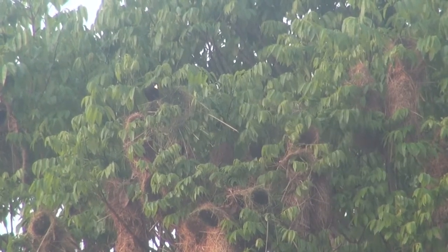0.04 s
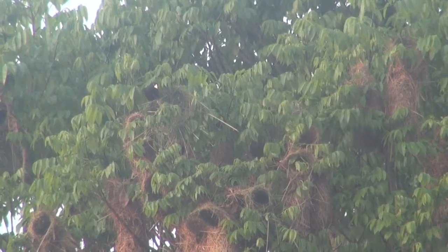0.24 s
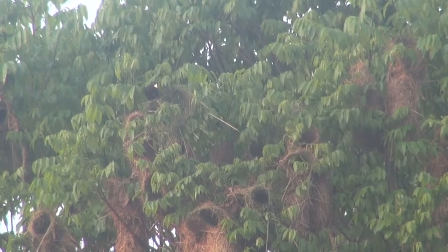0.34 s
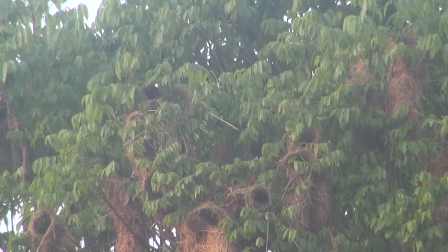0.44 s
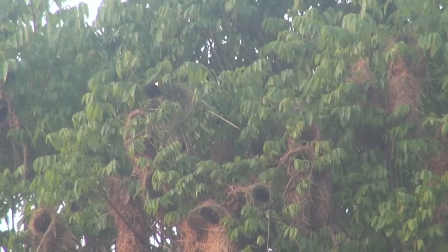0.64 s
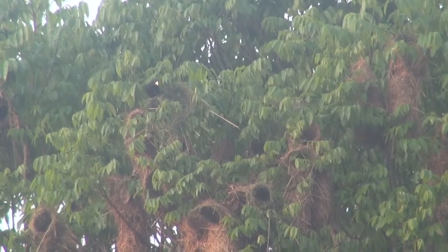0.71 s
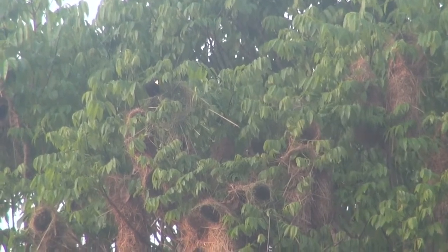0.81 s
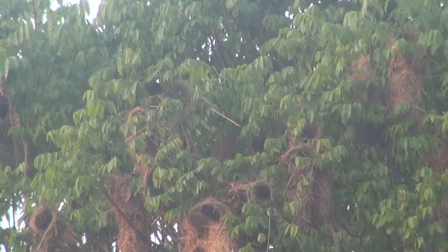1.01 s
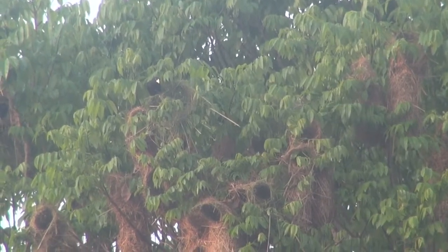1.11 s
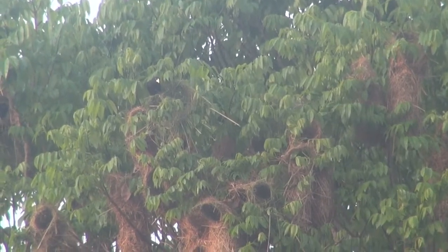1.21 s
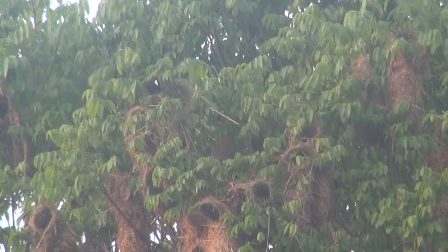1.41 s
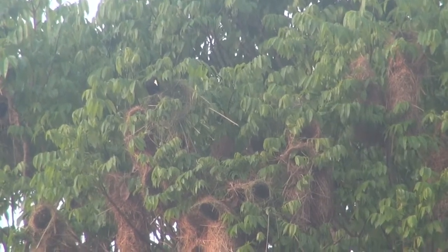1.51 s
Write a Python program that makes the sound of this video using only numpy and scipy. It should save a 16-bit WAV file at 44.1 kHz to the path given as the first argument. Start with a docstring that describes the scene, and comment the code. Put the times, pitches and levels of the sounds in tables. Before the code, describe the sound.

Birds call to the right in a thick forest: a faint whoop, one close, rough squawk with a brief echo, distant whistles and pips, and finally a quick raspy chatter. Leaves hiss softly and steadily underneath.

```python
"""A near bird's short, harsh squawk, thrown back by the trunks of a dense tropical forest.
A second bird chatters in quick, raspy upward sweeps. Both voices are fluttering harmonics
shaped by a throat, plus noise. The chattering bird also gives one arched, almost pure whoop;
farther birds whistle and pip. The birds sit to the right, over a steady hiss of foliage,
a thin distant drone and a low hum."""
import sys
import numpy as np
from scipy import signal
from scipy.fft import rfft, irfft, next_fast_len
from scipy.io import wavfile
from scipy.ndimage import map_coordinates

SR = 44100
rng = np.random.default_rng(int(sys.argv[2]) if len(sys.argv) > 2 else 0)


def log_audio(samples):
    """Write samples as a 16-bit WAV file to the path given in sys.argv[1]."""
    # one column per channel
    frames = np.atleast_2d(samples).T
    # limit to full scale, then quantise
    limited = np.clip(frames, -1, 1)
    pcm = np.round(limited * 32767).astype(np.int16)
    wavfile.write(sys.argv[1], SR, pcm)


N = 68355

# Squawk contour. Each row: time in seconds, pitch in Hz, level before the throat in dB,
# extra ring of harmonic 2 in dB, roughness factor.
SQUAWK_CONTOUR = [(.191, 566.6, -48.5, 4.5, 0.04), (.2, 581.3, -39, 6.5, 0.25),
                  (.21, 678.7, -26, -4.5, 0.1), (.218, 744.3, -21.5, 2, 0.31), (.226, 652.5, -21.5, -2, 0),
                  (.235, 750.2, -26, 3, 0.48), (.246, 699, -26.5, 7, 0.65), (.2495, 701, -27.5, -4.5, 1.23),
                  (.254, 750.6, -22.5, 3, .8), (.26, 705, -30, 6, 0.86), (.273, 631, -29, 0, 1.14),
                  (.285, 624, -38, 0, 1.23), (.303, 540, -45.5, 0, 1)]
# Squawker's throat. Each row: frequency in Hz, gain in dB.
SQUAWK_THROAT = [(350, -40), (570, -13), (640, -10), (1100, -8), (1300, -8), (1450, -4), (1720, -14),
                 (2000, -14), (2350, -32.5), (2900, -32), (3500, -53), (9000, -74)]
# Rasp in the squawk. Each row: frequency in Hz, relative density in dB.
SQUAWK_RASP_SPECTRUM = [(450, -31), (800, 1), (950, -4), (1150, 10), (1450, -1), (1900, 8.5), (2300, -17),
                        (2600, -37)]
# Thin overtone on the squawk. Each row: time in seconds, pitch in Hz, level in dB.
OVERTONE_CONTOUR = [(.198, 9960, -79), (.215, 9850, -57), (.225, 10000, -71), (.24, 10300, -51.5),
                    (.28, 10040, -78)]
# Chatter notes. Each row: start in seconds, length in seconds, low pitch in Hz, top pitch in Hz,
# level in dB, fade in dB per second, then gains in dB of harmonics 1, 2, 3 on the held top.
CHATTER_NOTES = [(1.252, 0.039, 2100, 2942, -51.5, 2, 1, 7.5, 10),
                 (1.306, 0.047, 1100, 2800, -48, 104, -11, -0.5, -7.5),
                 (1.375, .042, 1002, 2554, -46.5, 150, 3, 4.5, 3),
                 (1.442, 0.0566, 998, 2581, -49, 28, 2.5, -8, 8),
                 (1.504, 0.045, 950, 2492, -49, 202, 1, -5, 7)]
# Chatter source. Each entry: gain in dB, for harmonics 1 to 5.
CHATTER_HARMONICS_DB = [1, -2.5, -7.5, -4, -24]
# Chatterer's throat. Each row: frequency in Hz, gain in dB.
CHATTER_THROAT = [(1000, 7), (1600, -1.5), (2550, -7), (3300, 5), (4500, 5), (5200, -1.5), (5800, 2),
                  (7500, -8), (8800, 1), (10000, -15.5), (14000, -15)]
# Noise in each chatter note. Each row: frequency in Hz, relative density in dB.
CHATTER_HOARSE_SPECTRUM = [(900, -45), (1600, 2), (3000, -14), (5000, -2), (9300, -8), (13000, -19),
                           (16000, -48)]
# Rasp under the chatter. Each row: time in seconds, level in dB.
CHATTER_RASP_ENVELOPE = [(1.222, -86), (1.24, -55.5), (1.27, -51.5), (1.35, -50.5), (1.44, -53.5),
                         (1.55, -52.5)]
# Colour of that rasp. Each row: frequency in Hz, relative density in dB.
CHATTER_RASP_SPECTRUM = [(500, -63), (1700, -38), (2200, -10), (2650, -2.5), (4600, -3.5), (5800, -5.5),
                         (8000, -11.5), (11000, -23.5), (16000, -51)]
# Chatterer's whoop. Each row: time in seconds, pitch in Hz, level in dB.
WHOOP_CONTOUR = [(.052, 1080, -62.5), (.07, 1117, -54), (.08, 1442, -57.5), (.091, 1873, -45),
                 (.1, 2163, -57), (.113, 2855, -59), (.13, 2850, -63), (.141, 2400, -55), (.149, 2150, -59)]
# Whistles. Each row: start in seconds, length in seconds, start, middle and end pitch in Hz, level in dB.
WHISTLE_NOTES = [(-.04, 0.18, 8040, 8050, 8400, -66), (0.378, 0.095, 3750, 3164, 2365, -64),
                 (0.469, 0.038, 3230, 3315, 3180, -58), (0.626, 0.046, 8100, 7920, 7780, -71.5),
                 (0.591, 0.069, 4530, 3853, 3060, -61), (1.503, 0.0081, 2627, 3310, 4500, -45.5)]
# Far pips. Each row: peak time in seconds, level in dB.
PIP_NOTES = [(.629, -55), (0.686, -59), (.742, -54.5), (.799, -57.5), (.857, -59), (0.915, -57.5),
             (.977, -56.5)]
# Low note before the squawk. Each row: time in seconds, pitch in Hz, level in dB.
LOW_NOTE_CONTOUR = [(.04, 167.3, -70.5), (.14, 164.4, -64), (.16, 193.4, -61), (.185, 219, -56.5),
                    (.21, 242, -91)]
# Echoes off near trunks and far stands of trees. Each row: delay in seconds, gain in dB.
TRUNK_ECHOES = [(.022, -12.5), (.043, -27.5), (.069, -17.5)]
FAR_TREE_ECHOES = [(.16, -24), (.33, -31.5)]
# Forest ring. Each row: frequency in Hz, T60 in seconds.
FOREST_T60 = [(600, 1.65), (1500, 1.02), (4000, 0.46), (12000, 0.33)]
# Foliage hiss on each side. Each row: frequency in Hz, relative density in dB.
HISS_LEFT_SPECTRUM = [(25, -36), (60, -13), (150, -2), (300, -4.5), (700, -12.5), (1400, -14.5),
                      (3000, -24.5), (6000, -19), (10000, -22.5), (12000, -35.5), (16000, -43)]
HISS_RIGHT_SPECTRUM = [(25, -32), (60, -0.5), (150, -4), (300, -4.5), (500, -14.5), (850, -18), (1400, -9),
                       (3000, -15.5), (6000, -19), (10000, -21.5), (16000, -21.5)]
# The hiss eases off. Each row: time in seconds, gain in dB.
HISS_ENVELOPE = [(0, 2), (.55, 1.5), (.9, -0.5), (1.55, 0)]
# Hum and drones. Each row: centre in Hz, half-width in Hz, level in dB, left minus right in dB.
DRONE_BANDS = [(69.2, 2.8, -72.5, -15), (1105.5, 52, -70.5, -15), (2070, 31, -78.5, -7.5)]

TOP_HZ = 15850


def squawk(rasp_db=-11.5, hiss_db=-38.5):
    """A clear rising start rings on harmonic 2, then breaks into a rough, falling end."""
    hz, db, ring_db, rough, gate = curves(SQUAWK_CONTOUR)
    jitter = .032 * rough * wobble(650)
    harmonics_db = [0, ring_db, 0, 0, 0, 0, 0, 0]
    voiced = voice(hz * (1 + jitter), SQUAWK_THROAT, flutter=.32 * rough, harmonics_db=harmonics_db)
    rasp = amp(rasp_db) * rough * noise(SQUAWK_RASP_SPECTRUM)
    hiss = amp(hiss_db) * noise([(500, -40), (1500, 0), (4000, -3), (7000, -5), (12000, -16)])
    return gate * amp(db) * (voiced + rasp + hiss)


def overtone():
    """A thin, unsteady tone riding on the squawk."""
    hz, db, gate = curves(OVERTONE_CONTOUR)
    return gate * amp(db) * tone(hz * (1 + .0236 * wobble(1200)))


def among_trunks(call, left_lag_s=.000697):
    """A near call: sharp echoes off trunks, blurred ones off leaves and far trees. Left arrives later."""
    outgoing = thinned(call)
    blurred = scatter(outgoing, [(1000, .1)], rise_s=.002)
    far_trees = echoes(thinned(blurred), FAR_TREE_ECHOES)
    ring = scatter(outgoing, FOREST_T60, rise_s=.024)
    diffuse = amp(-9.5) * blurred + far_trees + amp(-26) * ring
    left, right = pan(-16) * (call + echoes(outgoing, TRUNK_ECHOES)) + pan(-19.5) * diffuse
    return np.array([echoes(left, [(left_lag_s, 0)]), right])


def chatter(sweep_mid_s=.012, sweep_s=.008, attack_s=.011, hold_s=.019, release_s=.0081, hoarse_db=-7):
    """Each note sweeps up hoarsely, then steadies and rings on its top pitch, over a continuous rasp."""
    notes, effort = np.zeros(N), np.zeros(N)
    for start_s, length_s, low_hz, top_hz, db, fade_db_per_s, *held_db in CHATTER_NOTES:
        t = clock() - start_s
        climb = (1 + np.tanh((t - sweep_mid_s) / sweep_s)) / 2
        jitter = (.05 - .044 * climb) * wobble(2000)
        hz = (low_hz + (top_hz - low_hz) * climb) * (1 + jitter)
        gate = np.clip(t / attack_s, 0, 1) * np.clip((length_s - t) / release_s, 0, 1)
        level = gate * amp(db - fade_db_per_s * np.clip(t - hold_s, 0, length_s))
        held = np.clip(2 * (t / hold_s - 1), 0, 1)
        harmonics_db = [base + held * gain for base, gain in zip(CHATTER_HARMONICS_DB, held_db + [0, 0])]
        notes += level * voice(hz, CHATTER_THROAT, flutter=.55 - .33 * held, harmonics_db=harmonics_db)
        effort += level * (1 - held / 2)
    hoarse = amp(hoarse_db) * effort * noise(CHATTER_HOARSE_SPECTRUM)
    rasp_db, rasp_gate = curves(CHATTER_RASP_ENVELOPE)
    rasp = rasp_gate * amp(rasp_db) * noise(CHATTER_RASP_SPECTRUM)
    call = perch_reflection(notes + (hoarse + rasp) * amp(wobble(250)))
    return place(call, balance_db=-6, leaves_db=-5, leaves_t60_s=.089, forest_db=-12.5,
                 echo_balance_db=-3.5)


def whoop():
    """The chatterer's almost pure note, climbing and falling back."""
    hz, db, gate = curves(WHOOP_CONTOUR)
    hz = hz * (1 + .015 * wobble(1200))
    partials = tone(hz) + amp(-41) * tone(2 * hz) + amp(-27) * tone(4 * hz)
    call = perch_reflection(gate * amp(db) * partials)
    return place(call, balance_db=-9, leaves_db=-14, leaves_t60_s=.12, forest_db=-20)


def whistles(waver_hz=130):
    """Short, wavering whistles from farther birds, each bent through three pitches."""
    out = np.zeros(N)
    for start_s, length_s, *pitches_hz, db in WHISTLE_NOTES:
        progress = np.clip((clock() - start_s) / length_s, 0, 1)
        hz = np.polyval(np.polyfit([0, .5, 1], pitches_hz, 2), progress)
        out += amp(db) * np.sin(np.pi * progress) * tone(hz + waver_hz * wobble(1200))
    return place(out, balance_db=-9, leaves_db=-2, leaves_t60_s=.18, forest_db=-8)


def pips(pitch_hz=1546, sigma_s=.0013):
    """An even run of tiny, soft sine bursts."""
    level = sum(amp(db) * np.exp(-((clock() - peak_s) / sigma_s) ** 2 / 2) for peak_s, db in PIP_NOTES)
    call = level * tone(np.full(N, pitch_hz))
    return place(call, balance_db=-8, leaves_db=-11, leaves_t60_s=.15, forest_db=-16)


def low_note():
    """A faint, husky note that rises just before the squawk."""
    hz, db, gate = curves(LOW_NOTE_CONTOUR)
    hz = hz * (1 + .12 * wobble(200))
    return pan(-9) * gate * amp(db) * (tone(hz) + amp(-13) * tone(2 * hz))


def foliage(left_db=-62, right_db=-57.5):
    """Soft hiss, independent on each side."""
    swell = amp(curves(HISS_ENVELOPE)[0] + .4 * wobble(6))
    left = amp(left_db) * noise(HISS_LEFT_SPECTRUM)
    right = amp(right_db) * noise(HISS_RIGHT_SPECTRUM)
    return swell * np.array([left, right])


def drones(waver_db=3.5):
    """A low hum and thin distant drones: narrow noise bands that waver in level."""
    out = np.zeros((2, N))
    for centre_hz, half_width_hz, db, balance_db in DRONE_BANDS:
        band = filtered(rng.standard_normal(N),
                        lambda hz: 1 / (1 + ((hz - centre_hz) / half_width_hz) ** 4))
        out += pan(balance_db) * amp(db + waver_db * wobble(8.65)) * unit_rms(band)
    return out


def place(call, balance_db, leaves_db, leaves_t60_s, forest_db, echo_balance_db=-5):
    """A call at its bearing, with quick leaf scatter and the long forest ring."""
    leaves = amp(leaves_db) * scatter(call, [(1000, leaves_t60_s)], rise_s=.0014)
    ring = amp(forest_db) * scatter(call, FOREST_T60, rise_s=.036)
    return pan(balance_db) * call + pan(echo_balance_db) * (leaves + ring)


def perch_reflection(call, delay_s=.00266, gain_db=-8):
    """A surface near the perch doubles the call, breaking a sweep into beads."""
    return echoes(call, [(0, 0), (delay_s, gain_db)]) / np.hypot(1, amp(gain_db))


def scatter(x, t60_rows, rise_s):
    """Stereo reflections that build up and die away; rows give T60 in seconds against Hz."""
    hz, t, bins = signal.stft(rng.standard_normal((2, SR)), SR, nperseg=256)
    decay = amp(-60 * t / along(t60_rows, hz)[:, None])
    tail = signal.istft(bins * decay, SR, nperseg=256)[1]
    tail *= 1 - np.exp(-np.arange(tail.shape[1]) / SR / rise_s)
    tail /= np.linalg.norm(tail, axis=1, keepdims=True)
    return signal.fftconvolve(x[None], tail, axes=1)[:, :N]


def echoes(x, rows):
    """Sum of delayed, scaled copies."""
    return filtered(x, lambda hz: sum(amp(db) * np.exp(-2j * np.pi * hz * s) for s, db in rows))


def thinned(x, corner_hz=920):
    """High-pass: leaves and trunks throw back little bass."""
    return filtered(x, lambda hz: 1j * hz / (corner_hz + 1j * hz))


def voice(hz, throat, flutter, harmonics_db):
    """Harmonics through a throat, each fluttering in strength."""
    out = np.zeros(N)
    for k, db in enumerate(harmonics_db, 1):
        gain = amp(db + along(throat, k * hz)) * (k * hz < TOP_HZ)
        out += gain * tone(k * hz) * (1 + flutter * wobble(320))
    return out


def tone(hz):
    """Sine of rms 1 following a pitch."""
    return np.sqrt(2) * np.sin(2 * np.pi * np.cumsum(hz) / SR)


def noise(spectrum):
    """Coloured noise of rms 1."""
    return unit_rms(filtered(rng.standard_normal(N), lambda hz: amp(along(spectrum, hz))))


def filtered(x, response):
    """Apply a frequency response."""
    size = next_fast_len(N + SR // 2)
    return irfft(rfft(x, size) * response(np.fft.rfftfreq(size, 1 / SR)), size)[..., :N]


def wobble(knots_per_s):
    """Smooth random curve."""
    knots = rng.standard_normal(int(N * knots_per_s / SR) + 4)
    return map_coordinates(knots, [clock() * knots_per_s])


def curves(rows):
    """Each column after time, per sample; then a gate open while the rows last."""
    times_s, *columns = np.transpose(rows)
    gate = (clock() >= times_s[0]) & (clock() <= times_s[-1])
    return [np.interp(clock(), times_s, column) for column in columns] + [gate]


def along(points, hz):
    """Interpolate (Hz, value) points on a log axis."""
    points_hz, values = np.transpose(points)
    return np.interp(np.log(np.abs(hz) + 1), np.log(points_hz + 1), values)


def pan(balance_db):
    """Left and right gains, mean 1; negative is right."""
    gains = amp([[balance_db / 2], [-balance_db / 2]])
    return gains / gains.mean()


def amp(db):
    """Decibels to gain."""
    return 10 ** (np.asarray(db) / 20)


def unit_rms(x):
    """Scale to rms 1."""
    return x / np.sqrt(np.mean(x ** 2) + 1e-20)


def clock():
    """Sample times in seconds."""
    return np.arange(N) / SR


def scene():
    """The birds over the forest background."""
    birds = low_note() + among_trunks(squawk() + overtone()) + chatter() + whistles() + whoop() + pips()
    return birds + foliage() + drones()


def record(dry):
    """Brick-wall low-pass at TOP_HZ."""
    return filtered(dry, lambda hz: hz < TOP_HZ)


dry = scene()
out = record(dry)
log_audio(out)
```